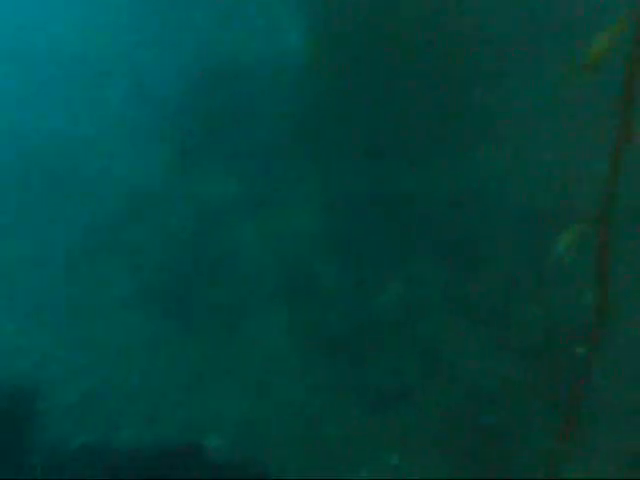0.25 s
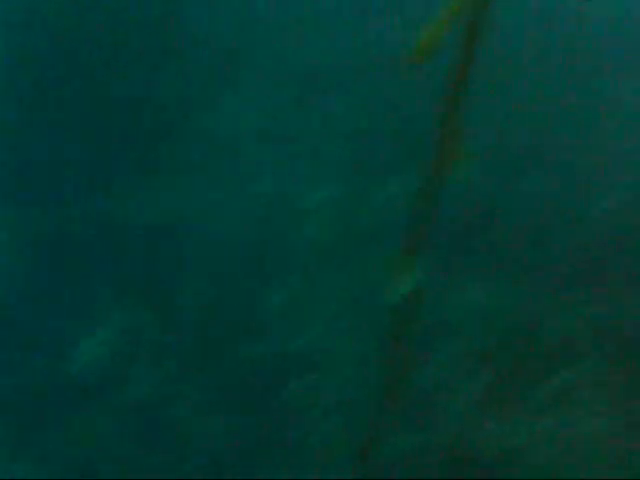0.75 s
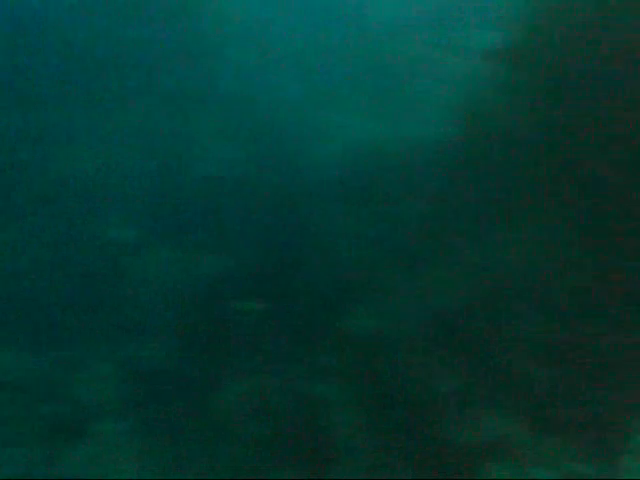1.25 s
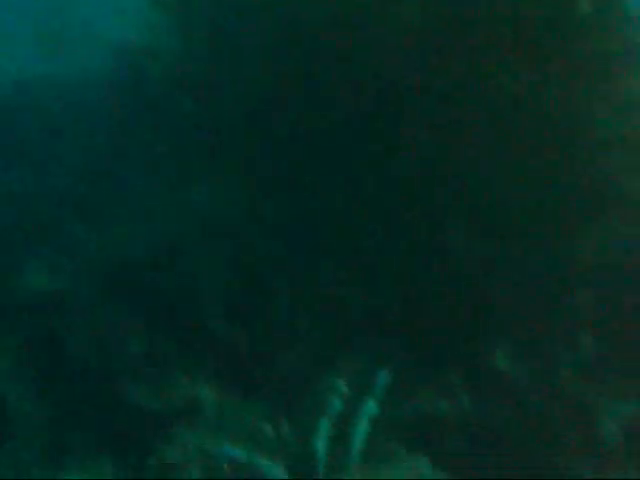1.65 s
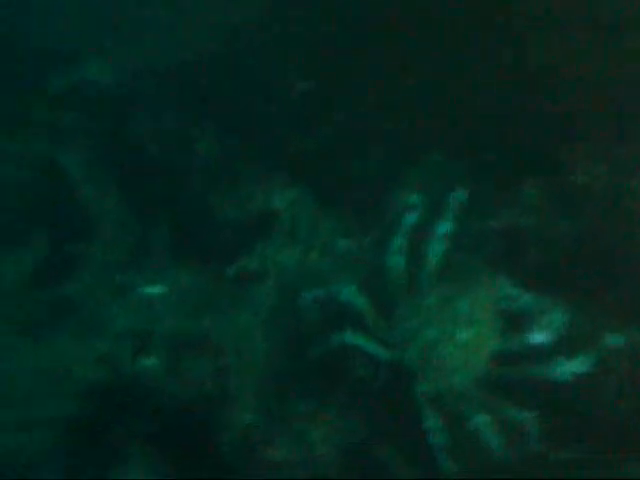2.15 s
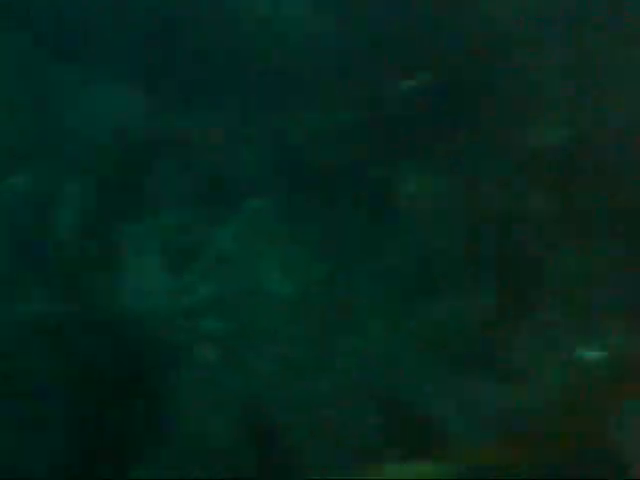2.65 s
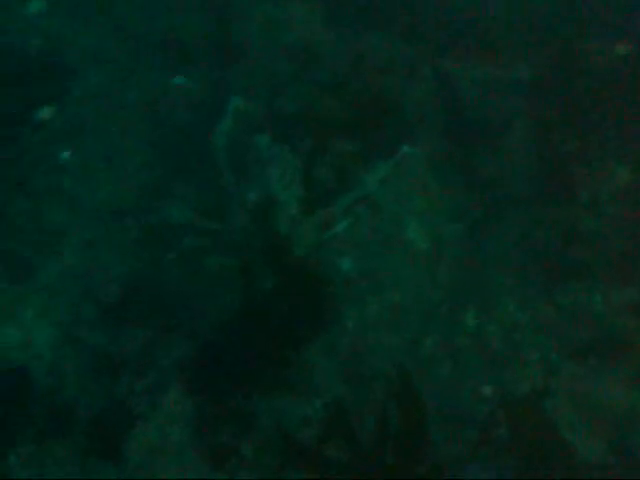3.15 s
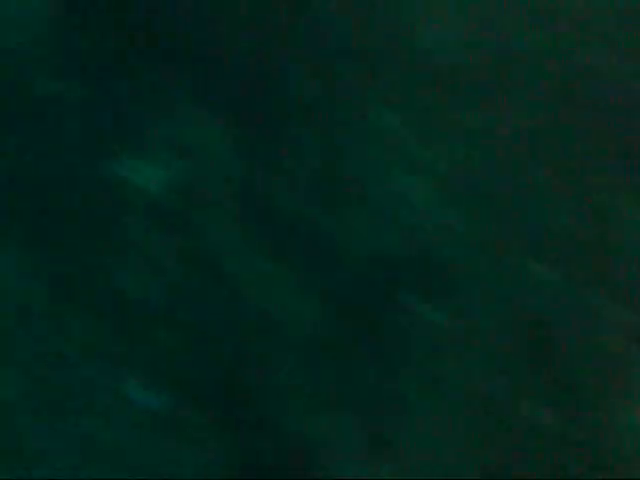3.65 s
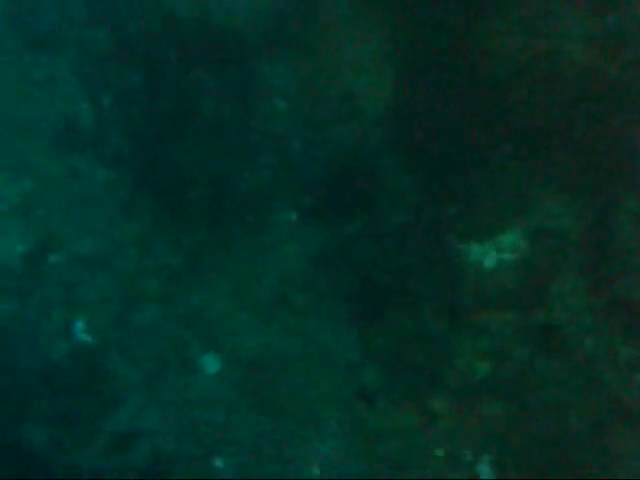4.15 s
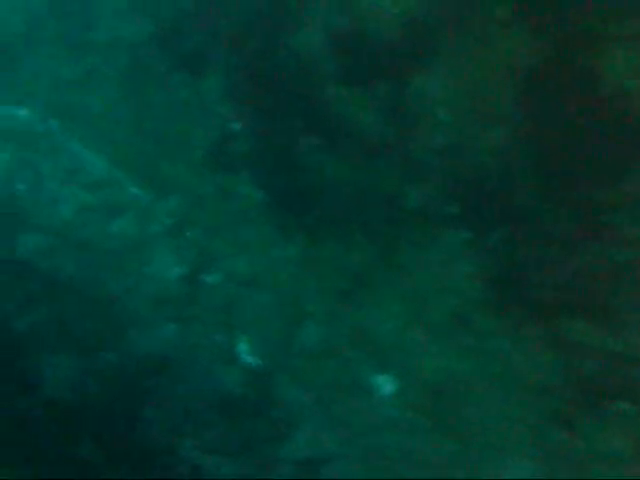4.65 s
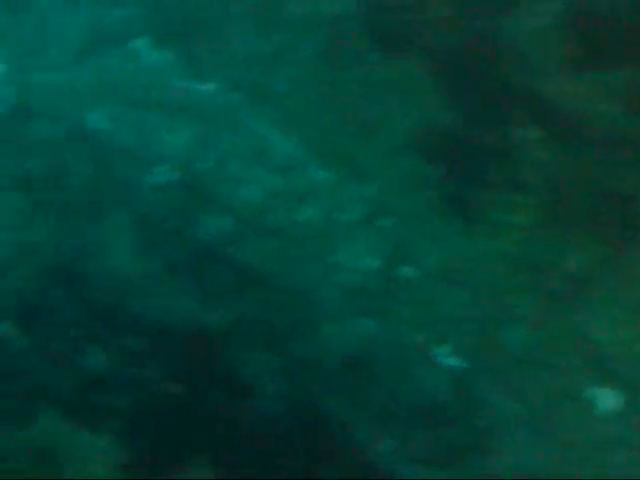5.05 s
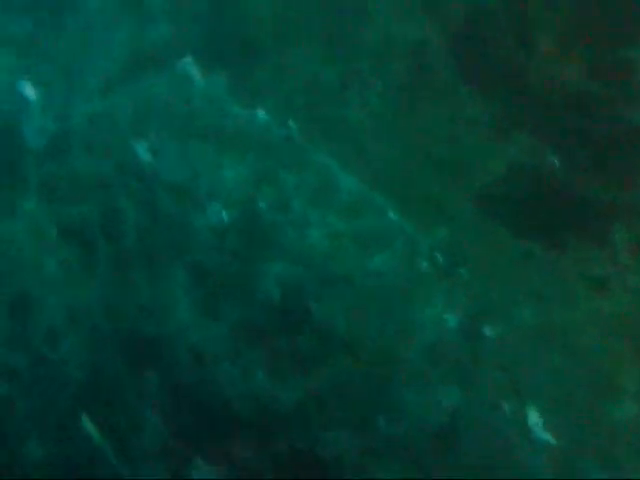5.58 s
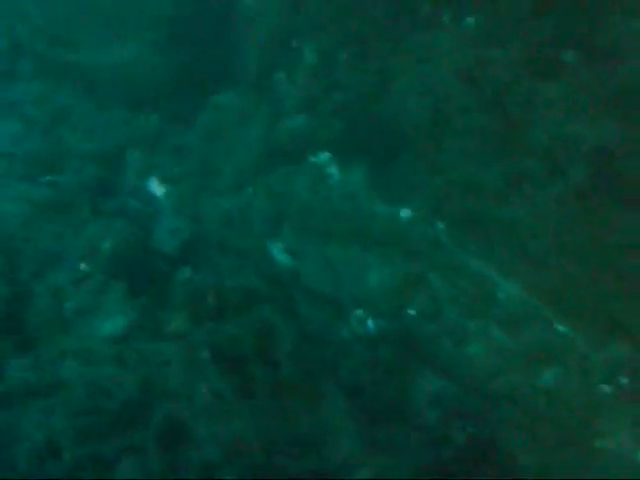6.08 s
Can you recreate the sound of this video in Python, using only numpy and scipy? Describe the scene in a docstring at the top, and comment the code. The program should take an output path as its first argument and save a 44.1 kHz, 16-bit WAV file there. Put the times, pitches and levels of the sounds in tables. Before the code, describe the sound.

Underwater near rocks, heard from within a closed case: hollow mid-low humming, low rumble and continuous tiny crackling with brighter close clicks. The diver's grip knocks and rubs the housing, with a quick creak, a cluster of clatter around five seconds, then one deep booming thud and a very loud dry snap just before the end.

```python
"""Over a rocky seabed, heard by a microphone inside a sealed camera housing that a diver carries. From the
start moving water drones near 400 Hz (shaped noise) and shrimp crackle (impacts through the wall). The grip
knocks and bumps the case (struck resonances, swelling tones), soon with scrapes and small bubbles. At 2.6 s the
case creaks (a run of soft blows); at 5.84 s comes the strongest blow, a heavy 109 Hz thump, and at 6.23 s the
loudest of the close snaps."""
import sys
import numpy as np
from scipy import signal
from scipy.fft import rfft, irfft, next_fast_len
from scipy.io import wavfile

SR = 44100
rng = np.random.default_rng(int(sys.argv[2]) if len(sys.argv) > 2 else 0)


def bounce(signal):
    """Save signal as a 16-bit WAV file at the path given by the first command-line argument."""
    frames = np.transpose(np.atleast_2d(signal))
    limited = np.clip(frames, -1, 1)
    pcm = np.round(limited * 32767).astype(np.int16)
    wavfile.write(sys.argv[1], SR, pcm)


N = 278712

# Resonances of the housing wall for sound from the water: [f/Hz, width/Hz, relative level/dB]
WALL_RESONANCES = [(428, 230, -4.5), (1008, 550, -4), (1358, 133, -1.5), (1958, 670, 4.5), (2161, 930, -2),
                   (2574, 690, -2.5), (3614, 396, 0.5), (4333, 414, -0.5), (5010, 230, -14),
                   (5760, 1000, -12.5)]


def from_db(db):
    """Decibels to amplitude gain."""
    return 10 ** (np.asarray(db) / 20)


def rms_one(x):
    """Scale to unit power."""
    return x / np.sqrt(np.mean(x ** 2) + 1e-20)


def in_time(rows):
    """Interpolate each column of a time curve to every sample."""
    s, *columns = np.transpose(rows)
    return [np.interp(np.arange(N) / SR, s, column) for column in columns]


def add(out, s, sound):
    """Mix a short sound in at time s."""
    at = int(np.clip(round(s * SR), 0, N - 1))
    out[at:at + len(sound)] += sound[:N - at]


def cut(x, hz, kind, order=2):
    """Butterworth low- or high-pass."""
    sos = signal.butter(order, min(hz, .45 * SR), kind, fs=SR, output="sos")
    return signal.sosfilt(sos, x)


def resonate(x, hz, width):
    """One two-pole resonance with about unit gain at its top; a narrower one rings longer."""
    r = np.exp(-np.pi * width / SR)
    numerator = np.array([1, 0, -1]) * (1 - r * r) / 2
    denominator = [1, -2 * r * np.cos(2 * np.pi * hz / SR), r * r]
    return signal.lfilter(numerator, denominator, x + 1e-18)


def steep_resonance(x, hz, width):
    """A resonance passed twice: it builds up briefly and leaves dark valleys on both sides."""
    return resonate(resonate(x, hz, width), hz, width)


def through_wall(x):
    """The wall passes sound through parallel resonances, with neighbours in opposite polarity."""
    out = np.zeros(N)
    for k, (hz, width, db) in enumerate(WALL_RESONANCES):
        out += (-1) ** k * from_db(db) * steep_resonance(x, hz, width)
    return out


def drift(rate):
    """Slow random wander: straight lines between normal draws, rate of them per second."""
    knots = rng.standard_normal(4096)
    return np.interp(np.arange(N) / SR * rate, np.arange(len(knots)), knots)


def coloured_noise(spectrum):
    """Noise with the given spectrum, interpolated over log frequency, rms 1."""
    hz, db = np.transpose(spectrum)
    size = next_fast_len(N)
    bins = np.maximum(np.fft.rfftfreq(size, 1 / SR), 1)
    gain = from_db(np.interp(np.log(bins), np.log(hz), db))
    white = rfft(rng.standard_normal(size))
    return rms_one(irfft(white * gain, size)[:N])


def impact_shapes(count, scatter_s, scatter_db, tail_s, tail_db):
    """Unit-energy impacts: a direct spike, a quick scatter of reflections and a faint tail."""
    t = np.arange(SR // 20) / SR
    spread = np.zeros(len(t))
    for decay_s, db in [(scatter_s, scatter_db), (tail_s, tail_db)]:
        unit_energy = np.sqrt(2 / (decay_s * SR))
        spread += from_db(db) * unit_energy * np.exp(-t / decay_s)
    shapes = spread * rng.standard_normal((count, len(t)))
    shapes[:, 0] += 1  # the direct spike
    return shapes / np.linalg.norm(shapes, axis=1, keepdims=True)


def strike(events, shapes, modes, ring, weight_of):
    """Play impacts into modes, each a little uneven; weight_of(Hz) scales the event's colour per mode."""
    out = np.zeros(N)
    uneven_db = 1.6 * rng.standard_normal((len(events), len(modes)))
    for k, (hz, width, mode_db) in enumerate(modes):
        force, weight = np.zeros(N), weight_of(hz)
        for (s, db, colour_db), shape, chance_db in zip(events, shapes, uneven_db[:, k]):
            level_db = db + mode_db + weight * colour_db + chance_db
            add(force, s, from_db(level_db) * shape)
        out += (-1) ** k * ring(force, hz, width)
    return out


def swell_and_ring(events, rise_s, decay_s):
    """Soft blows: a tone that builds up over the contact and dies away."""
    out, t = np.zeros(N), np.arange(SR // 8) / SR
    envelope = (1 - np.exp(-t / rise_s)) ** 2 * np.exp(-t / decay_s)
    envelope = envelope / envelope.max()
    for s, db, hz in events:
        add(out, s, from_db(db) * envelope * np.sin(2 * np.pi * hz * t))
    return out


def far_shrimp(crackle_db, per_s, spread_db, wash_db):
    """Countless farther snaps of uneven size merge into a steady crackle over a smooth wash."""
    size_db = spread_db * np.minimum(rng.exponential(1, N), 3.5)
    sizes = from_db(size_db) * rng.choice([-1, 1], N)
    snaps = rms_one(sizes * (rng.random(N) < per_s / SR))
    # each snap becomes a short burst of noise whose power decays over 5.4 ms
    power = signal.lfilter([1], [1, -np.exp(-1 / (0.0054 * SR))], snaps ** 2 + 1e-18)
    water = (rms_one(np.sqrt(power)) + from_db(wash_db)) * rng.standard_normal(N)
    return from_db(crackle_db) * rms_one(through_wall(water))


def drone(cavity_hz, cavity_width, cavity_db):
    """Flow noise, muffled by the case and tuned by the air inside it, over a low rumble."""
    # Water flowing round the housing: [f/Hz, relative density/dB per Hz]
    flow_spectrum = [(15, -3.5), (35, -5), (60, -3.5), (130, -6), (230, -1.5), (310, -0.5), (360, 5),
                     (410, 1), (470, -4), (540, -15), (630, -19.5), (850, -17), (1300, -26.5), (2500, -32),
                     (6000, -38.5)]
    # The water's push on the housing: [t/s, relative drone level/dB, relative rumble level/dB]
    flow_push = [(0.0, -32, -44), (0.37, -36.5, -46), (0.9, -35.5, -46), (1.11, -37, -46),
                 (1.53, -34, -46.5), (2.38, -35.5, -41), (2.57, -33.5, -34), (2.73, -36.5, -40.5),
                 (3.06, -36.5, -43.5), (3.38, -38, -42), (3.66, -33, -41), (4.05, -38, -45.5),
                 (4.68, -36.5, -49.5), (4.98, -37, -43), (5.38, -39.5, -48), (5.74, -40.5, -46),
                 (5.9, -42, -37.5), (6.32, -37.5, -53.5)]
    drone_db, rumble_db = in_time(flow_push)

    flow = rms_one(cut(coloured_noise(flow_spectrum), 193, "high"))
    cavity = rms_one(steep_resonance(rng.standard_normal(N), cavity_hz, cavity_width))
    hum = rms_one(flow + from_db(cavity_db) * cavity)

    low_noise = cut(coloured_noise(flow_spectrum), 158, "low")
    rumble = rms_one(cut(low_noise, 19.5, "high", order=4))

    # both levels waver at random around the push
    hum_gain = from_db(drone_db + 2.5 + 2.18 * drift(22))
    rumble_gain = from_db(rumble_db + 5 + 3.6 * drift(13))
    return hum_gain * hum + rumble_gain * rumble


def bubbles():
    """Each small bubble rings briefly at its own pitch."""
    # Small bubbles: [t/s, level/dB, f/Hz, decay/s]
    bubble_rows = [(0.734, -28.5, 2430, 0.0017), (0.763, -30, 1850, 0.002), (2.694, -36.5, 1940, 0.042),
                   (5.961, -29, 690, 0.0038)]
    out = np.zeros(N)
    for s, db, hz, decay_s in bubble_rows:
        out += swell_and_ring([(s, db, hz)], rise_s=0.002, decay_s=decay_s)
    return out


def faint_snaps(count):
    """Shrimp a few metres off snap at chance moments, one per equal slot, each with its own strength."""
    level_db, spread_db, body_db = -43, 2.5, 0.5  # relative, on the scale of the close snaps
    times = (np.arange(count) + rng.random(count)) / count * N / SR
    louder = np.clip(rng.standard_normal(count), -2, 2)
    return [(s, level_db + spread_db * chance, body_db) for s, chance in zip(times, louder)]


def near_shrimp():
    """Each claw snap arrives with echoes off the rock and rings the wall for a few milliseconds."""
    # The closest snaps: [t/s, relative level/dB, body around 2 kHz/dB]
    close_snaps = [(0.1699, -36, -5), (0.3286, -27.5, 5), (0.4758, -40, 2.5), (0.8249, -40, 2.5),
                   (1.0256, -36, -1), (1.0478, -22, -2), (1.1641, -32, -8), (1.2991, -36, -9),
                   (1.3494, -33, -7), (1.3676, -39.5, -3), (1.7094, -22, -5), (1.9231, -28, -6.5),
                   (2.0695, -28.5, 0), (2.1367, -29.5, -13), (2.1584, -22.5, -2), (2.2253, -24, -0.5),
                   (2.6927, -34, 5), (2.7166, -28.5, -0.5), (2.8511, -42, 10.5), (2.8807, -27.5, -4),
                   (3.0385, -21, -2.5), (3.3308, -30.5, -5.5), (3.4527, -36, 6.5), (3.5895, -37, 8),
                   (3.7788, -39, -6), (3.9635, -25.5, -7), (4.0297, -36, 0), (4.2326, -38.5, -4),
                   (4.4462, -44, 6), (4.5702, -19.5, -6.5), (4.8738, -39.5, 5.5), (4.8897, -26, 5),
                   (4.9057, -32, 3.5), (5.0888, -26.5, -2.5), (5.2395, -33.5, -12), (5.7421, -37, -2),
                   (6.061, -25.5, -11), (6.1921, -41, 7.5), (6.2228, -29.5, -6), (6.2346, -14.5, -8.5)]
    snaps = list(close_snaps) + faint_snaps(count=76)
    shapes = impact_shapes(len(snaps), scatter_s=.0018, scatter_db=3.5, tail_s=.014, tail_db=-12)

    def body_weight(hz):
        """Full weight below 1850 Hz, none above 3700 Hz."""
        return np.clip(np.log2(3700 / hz), 0, 1)

    return from_db(40.0) * strike(snaps, shapes, WALL_RESONANCES, steep_resonance, body_weight)


def scrapes(grains_per_s, low_hz, high_hz):
    """Tiny catches along the case tick the wall in quick succession under each stroke."""
    # Gritty scrapes: [start t/s, end t/s, level/dB]
    scrape_rows = [(0.688, 0.756, -43), (1.476, 1.535, -48.5), (2.67, 2.768, -41.5), (4.856, 4.988, -37.5)]
    grains = rng.standard_normal(N) * (rng.random(N) < grains_per_s / SR)
    grit = cut(through_wall(grains), low_hz, "high")
    grit = rms_one(cut(grit, high_hz, "low", order=1))
    t, stroke = np.arange(N) / SR, np.zeros(N)
    for start, end, db in scrape_rows:
        progress = np.clip((t - start) / (end - start), 0, 1)
        stroke += from_db(db) * np.sqrt(np.abs(np.sin(np.pi * progress)))
    return stroke * grit


def rubs(case_hz, spread_hz):
    """Stick and slip of the grip: a quick uneven run of soft blows makes the case creak."""
    # The grip slides over the case: [start t/s, end t/s, mean level/dB, slips per s]
    rub_rows = [(2.6, 2.658, -10.5, 100)]
    slips = []
    for start, end, db, per_s in rub_rows:
        for s in np.arange(start, end, 1 / per_s):
            late, louder, higher = rng.standard_normal(3)
            slips.append((s + 0.0022 * late, db + 0.61 * louder, case_hz + spread_hz * higher))
    return swell_and_ring(slips, rise_s=0.00054, decay_s=0.0047)


def bumps():
    """The grip shifts on the case and sets its low resonances ringing."""
    # Soft bumps of the grip: [t/s, relative level/dB, f/Hz]
    bump_rows = [(0.108, -21.5, 396), (0.275, -23, 410), (0.371, -16, 384), (0.504, -20.5, 390),
                 (0.55, -22, 405), (0.658, -19, 334), (0.843, -23.5, 297), (1.771, -18, 221),
                 (1.886, -21.5, 230), (2.259, -20, 226), (2.679, -14.5, 409), (2.693, -22.5, 353),
                 (2.948, -22, 374), (3.104, -20.5, 385), (4.596, -20.5, 388), (4.751, -24.5, 406),
                 (6.026, -30, 450)]
    return from_db(3.0) * swell_and_ring(bump_rows, rise_s=0.0012, decay_s=0.0099)


def knocks():
    """Direct contacts ring the case; the bass weight tilts each from clatter towards low body."""
    # Hard knocks on the case: [t/s, relative level/dB, bass weight/dB]
    knock_rows = [(0.0260, -19, -6), (0.0367, -31.5, -6), (0.6675, -22.5, 0), (0.7648, -28.5, -0.5),
                  (0.9778, -22, 5.5), (1.4242, -29.5, -1.5), (1.5131, -32, -7), (1.5852, -28, 4),
                  (1.6423, -22.5, 1.5), (1.7621, -25.5, 3), (1.9566, -21, 6.5), (2.1003, -24, 4.5),
                  (2.351, -34.5, -1.5), (2.4051, -21.5, 2.5), (2.4237, -31.5, 8.5), (2.5262, -21, 0),
                  (2.916, -28, -3), (3.1296, -17, 5.5), (3.1433, -32, -14), (3.3999, -17.5, 7.5),
                  (3.4913, -32.5, 2), (3.5471, -30, -2), (3.5573, -15, 3), (3.5707, -27.5, 7.5),
                  (3.6094, -31, 1), (4.7419, -30, -1.5), (4.926, -30, -7), (4.9386, -35, 3),
                  (4.9796, -17, -0.5), (4.9922, -25.5, 0), (5.002, -32.5, -3), (5.0264, -23.5, 2.5),
                  (5.147, -33.5, -6.5), (5.167, -29.5, 2), (6.2874, -30.5, -9)]
    # Resonances of the case when struck directly: [f/Hz, width/Hz, relative level/dB]
    case_resonances = [(79.4, 51, -1.5), (298, 124, 1), (414.6, 44.6, 9.5), (580, 138, -1.5), (786, 147, 1),
                       (988, 83, 0), (1140, 117, 1.5), (1280, 195, 1), (2074, 325, -8.5), (2800, 3600, -28),
                       (4000, 3800, -22)]
    shapes = impact_shapes(len(knock_rows), scatter_s=.0027, scatter_db=-2.0, tail_s=0.013, tail_db=-10)

    def bass_weight(hz):
        """Positive below 1 kHz and negative above it."""
        return np.clip(np.log2(1000 / hz), -.9, 1)

    return from_db(40.5) * strike(knock_rows, shapes, case_resonances, resonate, bass_weight)


def thumps(case_hz, case_db):
    """A heavy push swings the camera for a few cycles at most; its first jolt also rings the case."""
    # Deep thumps through the whole camera: [t/s, level/dB, f/Hz, length/s]
    thump_rows = [(0.657, -17, 129, 0.0096), (0.977, -16.5, 193, 0.0074), (1.759, -21, 132, 0.013),
                  (4.9485, -9.5, 178, .008), (4.9933, -8.5, 186, 0.0062), (5.8427, 2.5, 109.4, 0.032),
                  (6.01, -17, 99, 0.025)]
    swing, jolts, after_swings = np.zeros(N), [], []
    for s, db, hz, length in thump_rows:
        t = np.arange(int(length * SR)) / SR
        envelope = np.sin(np.pi * (t / length) ** 0.63) ** 1.64  # peaks early
        add(swing, s, from_db(db) * envelope * np.sin(2 * np.pi * hz * t))
        jolts.append((s, db + case_db, case_hz))
        after_swings.append((s, db - 32, hz))
    jolt = swell_and_ring(jolts, rise_s=0.0037, decay_s=0.0021)
    after_swing = swell_and_ring(after_swings, rise_s=0.0043, decay_s=0.039)
    return swing + jolt + after_swing


def scene():
    """Everything as it reaches the microphone inside the housing."""
    water = drone(cavity_hz=403.4, cavity_width=22.2, cavity_db=-3.0) + bubbles()
    shrimp = far_shrimp(crackle_db=-48, per_s=220, spread_db=5.0, wash_db=-28.5) + near_shrimp()
    grit = scrapes(grains_per_s=610, low_hz=750, high_hz=1290)
    handling = rubs(case_hz=375.5, spread_hz=17.4) + bumps() + knocks()
    handling += thumps(case_hz=287, case_db=-5.0)
    return (water + shrimp + grit + handling)[None]


def mirror_images(x, first_db, second_db):
    """A faint metallic edge: the slope of the sound is mirrored around 8 and 16 kHz."""
    phase = 2 * np.pi * 8000 * np.arange(N) / SR
    carriers = from_db(first_db) * np.sin(phase) + from_db(second_db) * np.cos(2 * phase)
    return x + np.gradient(x, axis=-1) * carriers


def record(dry):
    """A narrow-band recorder that adds mirror tones, rounds the peaks and cuts the top."""
    sound = mirror_images(cut(dry, 9170, "low", order=6), first_db=5.0, second_db=-11.0)
    sound = .95 * sound / (1 + np.abs(sound / .9) ** 6) ** (1 / 6)
    top_cut = signal.ellip(10, .2, 80, 15600, fs=SR, output="sos")  # ripple dB, stop dB, edge Hz
    return signal.sosfilt(top_cut, sound)


dry = scene()
out = record(dry)
bounce(out)
```